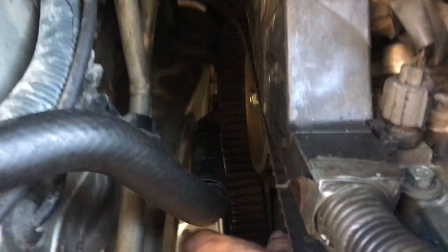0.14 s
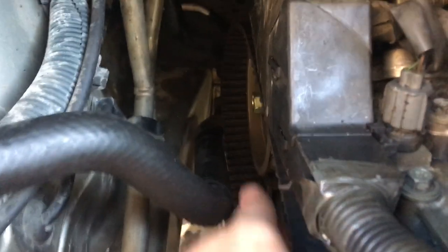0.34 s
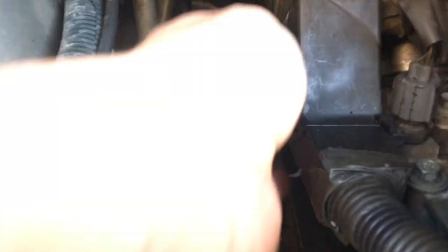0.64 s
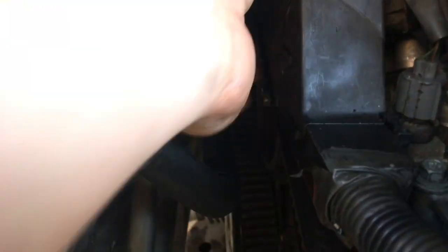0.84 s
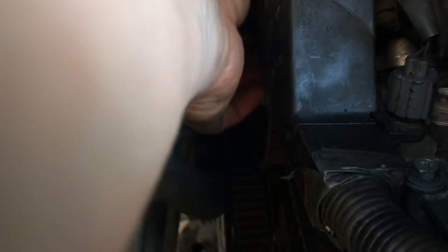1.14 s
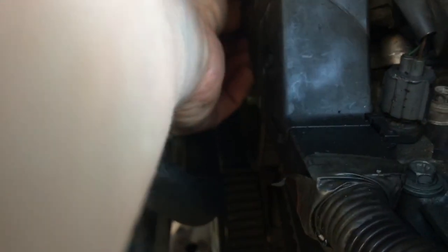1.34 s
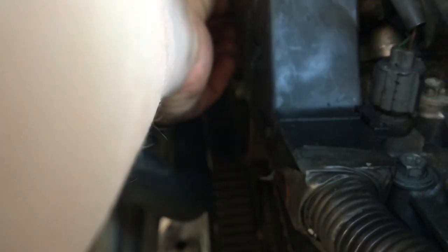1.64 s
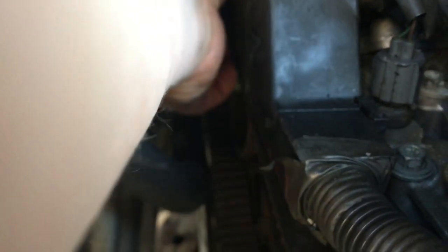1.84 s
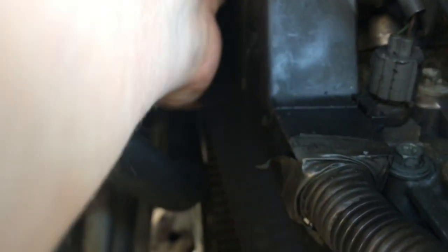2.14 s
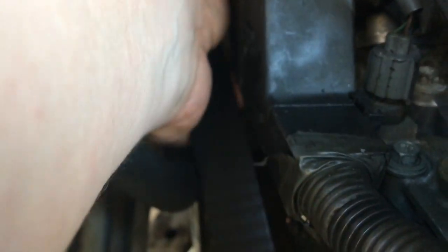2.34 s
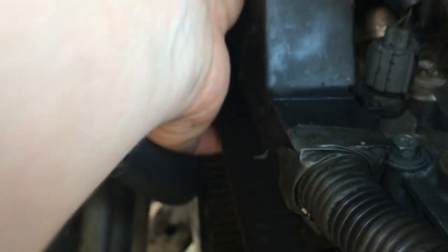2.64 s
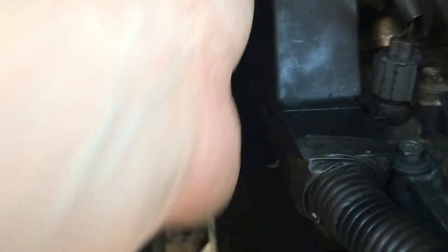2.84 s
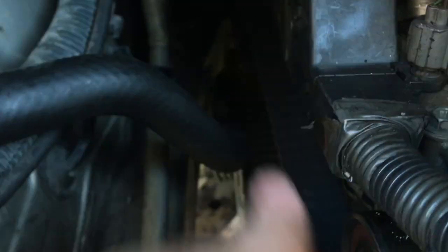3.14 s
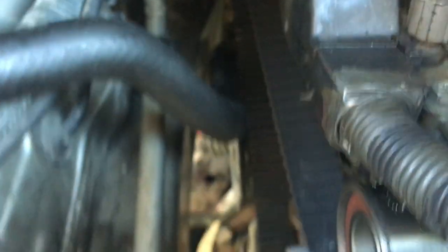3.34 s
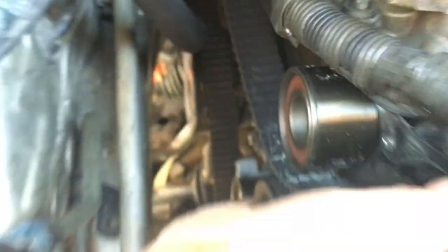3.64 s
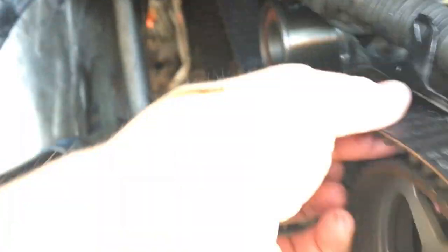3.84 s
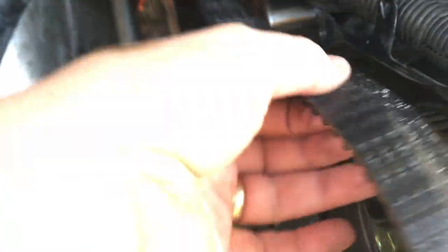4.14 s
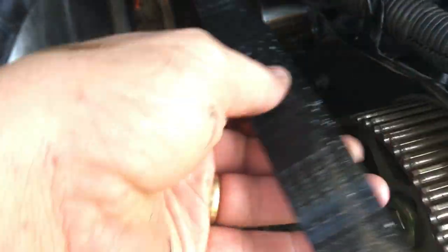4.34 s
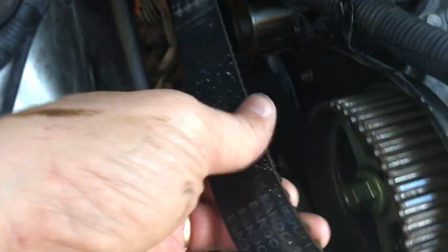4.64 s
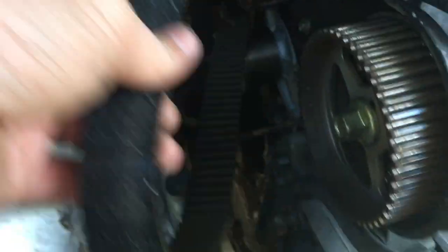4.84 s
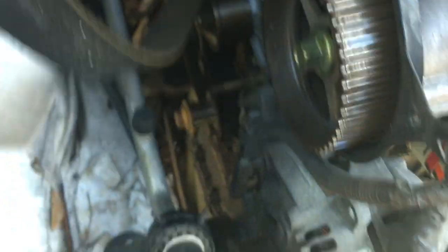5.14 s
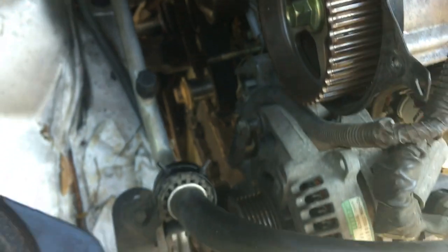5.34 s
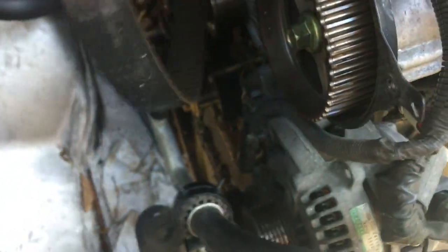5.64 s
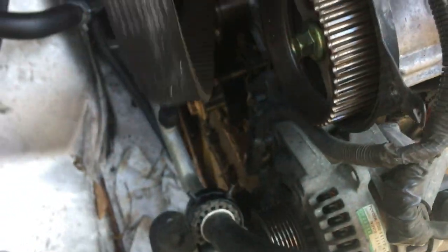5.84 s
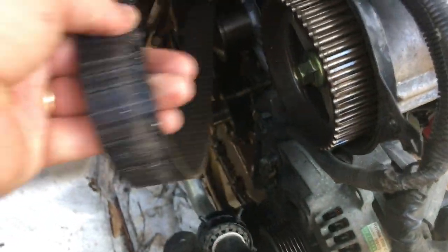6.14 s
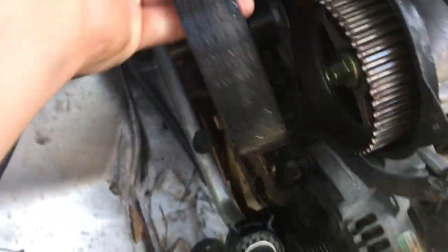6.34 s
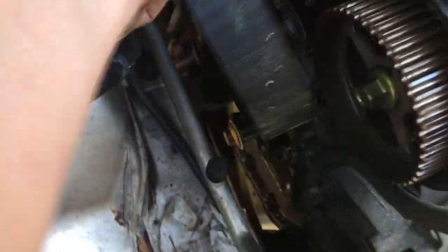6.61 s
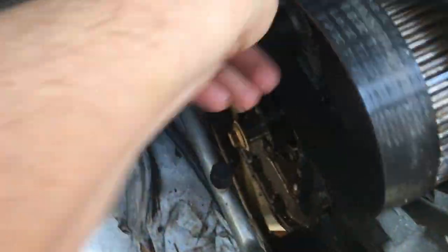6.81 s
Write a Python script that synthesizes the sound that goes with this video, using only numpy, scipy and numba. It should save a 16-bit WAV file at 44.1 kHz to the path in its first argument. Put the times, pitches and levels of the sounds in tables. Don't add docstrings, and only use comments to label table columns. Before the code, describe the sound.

A close, dry phone pickup inside an engine bay, with faint low machinery rumble and a wavering mains hum throughout. At 0.16 s a plastic clip lets go with a very loud, sharp snap and fast weakening rebounds; a soft belt slap follows at 0.46 s with small ticks. Until about 3.1 s, skin and rubber rub in irregular hissing, dragging strokes, with brief squeaks. Around 2.0 s steel wheels ring high and thin, and a strong tick lands at 2.4 s. After a short lull, rubbing resumes at 3.4 s, with ticks and metallic pings from 4.0 to 4.85 s. A heavy, dull slap hits at 4.92 s. Quieter drags follow, then light thin-metal brushes at 5.7-5.9 s. Knocks cluster at 6.0 s, with a soft slap at 6.13 s. Hard ticks, rubbing, slaps and bright ringing steel finish from 6.6 to 6.85 s.

```python
import sys
import numpy as np
from scipy import signal
from scipy.io import wavfile
from scipy.ndimage import uniform_filter1d
from numba import njit

SR = 44100
rng = np.random.default_rng(int(sys.argv[2]) if len(sys.argv) > 2 else 0)


def volts_from_db(level):
    exponent = np.asarray(level, float) / 20
    return 10 ** exponent


def master(y):
    cut = np.clip(np.atleast_2d(y).T, -1, 1)
    pcm = np.round(cut * 32767)
    wavfile.write(sys.argv[1], SR, pcm.astype(np.int16))


N = 307377

# start in seconds, length in seconds, skin hiss in dB,
# rubber drag over the hiss in dB.
SLIDES = [(0.03, 0.24, -64.5, -3), (.244, 0.31, -64, 0), (0.47, 0.3, -59.5, -5), (0.862, 0.63, -66.5, 5),
          (.928, 0.1, -60.5, -2), (1.086, 0.21, -61, 1.5), (1.519, 0.22, -72, 7.5),
          (1.761, 0.5, -66.5, 1.5), (2.258, 0.12, -71.5, 2.5), (1.877, 0.23, -61.5, -3),
          (2.447, 0.23, -68.5, 2), (2.637, 0.13, -58.5, -2.5), (2.763, 0.31, -63.5, -10),
          (3.44, 0.094, -69.5, 3.5), (3.62, 0.26, -70, -1.5), (3.836, 0.49, -66.5, 8),
          (4.316, 0.14, -72.5, 12.5), (4.436, 0.418, -66, 10), (4.767, 0.26, -65.5, 8),
          (5.006, 0.18, -75, 13.5), (5.05, 0.24, -77.5, 8), (5.19, 0.38, -85, 14.5),
          (5.607, 0.36, -74.5, 5), (5.951, 0.12, -67, 4), (6.109, 0.29, -82, 16), (6.238, 0.34, -68, 4),
          (6.633, 0.44, -64.5, 3.5)]
# start in seconds, length in seconds, skin hiss in dB,
# rubber drag over the hiss in dB.
JERKS = [(0, 0.015, -80.5, 25), (0.503, 0.061, -63, -13), (0.565, 0.059, -56, -0.5),
         (1.546, 0.079, -64.5, 1), (1.963, 0.081, -53, -14), (2.2, 0.04, -58, 1.5),
         (2.362, 0.033, -58.5, 2), (2.398, 0.038, -52.5, -3), (2.487, 0.088, -53, -5.5),
         (2.926, 0.091, -60, -12), (2.998, 0.055, -62.5, 2.5), (3.484, .045, -63, -5),
         (3.523, 0.024, -49.5, -3), (3.634, 0.044, -66.5, -1.5), (3.88, 0.36, -81, 22),
         (4.052, 0.076, -57, 4), (4.195, 0.11, -56, -20), (4.605, 0.16, -55, -7),
         (5.147, 0.036, -60.5, -18), (5.28, 0.053, -66, -13), (5.56, 0.043, -63.5, 4.5),
         (5.78, .07, -62, -13), (6.075, 0.035, -61, 3.5), (6.6, 0.04, -44.5, -16),
         (6.637, 0.029, -56.5, -5), (6.334, 0.119, -67.5, 3), (6.748, 0.044, -68, -1),
         (6.762, 0.11, -59, -16.5), (6.847, 0.085, -60, 5.5)]
STROKE_RISE_S, STROKE_FALL_S, REST_DB = 0.014, 0.031, -80
# centre in Hz, width in Hz, level in dB.
DRAG_BANDS = [(300, 59, 8.5), (680, 400, 5.5), (1180, 220, 1), (1597, 950, 1.5), (2200, 160, 2.5),
              (3000, 460, -7.5)]
# centre in Hz, width in Hz, level in dB.
HISS_BANDS = [(4335, 2500, -0.5), (6563, 1400, 0.5), (8810, 2075, -0.5), (12500, 6600, 0)]
# start
# in seconds, resonance in Hz.
HAND_CAVITY = [(0, 1481), (.463, 3910), (.63, 5200), (.928, 3083), (1.29, 6127), (1.5, 2397), (1.88, 3260),
               (2.384, 5930), (3.05, 1179), (4.031, 3613), (4.121, 2200), (4.86, 5800), (4.91, 3883),
               (5.094, 3790), (5.2, 3480), (5.552, 3326), (5.966, 4204), (6.236, 3893), (6.375, 4490),
               (6.425, 3950), (6.59, 5390), (6.74, 1800), (6.849, 1400)]
# start in seconds, length in seconds, first pitch in Hz,
# last pitch in Hz, level in dB.
SQUEAKS = [(0.278, 0.11, 1514, 1620, -61), (0.922, 0.061, 3700, 3520, -56),
           (2.205, 0.028, 2080, 1760, -54.5), (3.016, 0.041, 1800, 1540, -64), (3.58, 0.26, 744, 637, -61),
           (3.868, 0.07, 960, 1240, -55.5), (4.053, 0.043, 3000, 3000, -52), (4.95, 0.06, 5250, 5200, -61),
           (5.784, 0.037, 2190, 2120, -61), (6.37, 0.074, 2570, 2530, -64),
           (6.592, 0.08, 2190, 2300, -50.5)]

# start in seconds, peak in dB, contact pitch in Hz,
# bright crack over the peak in dB.
TICKS = [(0.585, -34.5, 7260, 6), (.607, -33.5, 3480, 7.5), (.933, -35.5, 3500, -14),
         (2.002, -40.5, 3450, 16), (2.016, -44, 3000, 4), (2.071, -44, 2100, -2), (2.125, -46, 2100, 6),
         (2.203, -41, 1990, -10), (2.306, -54, 5000, 4), (2.338, -49, 5000, 4), (2.355, -54, 5500, 2),
         (2.256, -42, 3500, 8), (2.417, -21, 6030, -28), (2.58, -37, 3000, -15), (2.662, -47, 5500, 14),
         (3.53, -34.5, 2063, 6.5), (4.028, -35, 3900, -12), (4.03, -32.5, 2620, -20),
         (4.06, -33.5, 3280, -10), (4.242, -51, 2290, 1), (4.342, -37.5, 3970, 3), (4.445, -45, 2900, -10),
         (4.526, -31.5, 3930, 0), (4.606, -37.5, 3530, 9), (4.636, -37, 3490, 9), (4.656, -38, 3490, 5),
         (4.68, -42, 4500, 4), (4.706, -43, 5200, 2), (4.73, -43, 5000, 2), (5.789, -47, 2110, -3),
         (5.984, -30, 3670, -42), (6.088, -42, 3970, 0), (6.606, -39, 3000, -5), (6.617, -35, 4300, 5),
         (6.628, -36, 3300, -2), (6.687, -21, 3700, -32.5), (6.7, -41, 3500, -8), (6.767, -42.5, 3600, -8),
         (6.779, -33, 3380, -14)]
# start in seconds, peak in dB, contact pitch in Hz, bright crack over the peak in dB.
SCUFFS = [
    (2.029, -35, 3450, -12.5),
    (3.885, -44, 1110, -14),
    (5.573, -45, 2020, -16.5),
    (5.84, -42.5, 3230, -3),
    (6.602, -36, 2220, -13),
]
# start in seconds, peak in dB, contact pitch in Hz, thud over the peak in dB.
KNOCKS = [(0.167, -19, 720, -5.5), (0.72, -58.5, 1240, 15.5), (2.15, -39, 2010, -5.5),
          (2.724, -48.5, 3250, 9.5), (2.949, -50, 500, 14.5), (3.553, -38, 716, -20), (4.2, -31.5, 965, -2),
          (4.854, -39, 1020, 0), (5.369, -46, 1200, 7), (5.966, -32, 4050, -6.5),
          (6.012, -26.5, 3580, -6.5), (6.0264, -25.5, 3900, -7), (6.33, -40.5, 3860, -3.5),
          (6.729, -37.5, 1800, 1.5), (6.743, -39, 1460, 6), (6.799, -41.5, 3500, 11.5),
          (6.82, -24, 820, -2.5)]
TICK_T60_S, SCUFF_T60_S, KNOCK_T60_S = 0.022, 0.068, 0.053
TICK_THUD_DB, KNOCK_CRACK_DB = -27, -68
TICK_RISE_S = 0.0011

# start in seconds, level in dB, lean to the small wheel in dB,
# rim over the strike in dB.
STRIKES = [(.355, -69, -4, -9), (.77, -75.5, 4, -9), (1.048, -72, -12, -12), (1.287, -69, 9, -8),
           (1.345, -73, -4, -2), (1.3818, -70, 6, 0), (1.492, -73, 4, -6), (1.56, -72, 2, 6),
           (1.602, -60, 16, -5), (1.699, -67, 6, 0), (1.797, -62.5, -6, 1), (1.8397, -65.5, 22, 9.5),
           (1.899, -68, 8, 8), (1.9494, -58.5, -8, -16), (1.9704, -44.5, -28, -3), (2.0023, -37, -17, -4),
           (2.0294, -53, -15, -22), (2.0744, -48, -25, -12), (2.2554, -60, -23, 1.5), (2.655, -68, -21, -8),
           (2.6794, -66, -20, -12), (2.724, -57.5, -26, -21), (3.0694, -74.5, -11, -12),
           (3.882, -67.5, 12, -9), (4.0278, -69, 16, 11), (4.0606, -75, 14, -2), (4.13, -64.5, 14, -6),
           (4.341, -69, 19, 4), (4.48, -72, -10, -9), (4.525, -55.5, 5, 0), (4.591, -57.5, 9, -5),
           (4.6055, -51.5, -3, -11), (4.6359, -55.5, -1, -17), (4.6567, -49, -2.5, -15), (4.69, -60, 4, -9),
           (4.73, -56.5, -2.5, -12), (4.825, -66, 2, -12), (4.8497, -62.5, 2.5, 3), (4.97, -63.5, 10, -9),
           (5.02, -76, 12, -7), (5.99, -67.5, 14, 2), (6.035, -57, -11, -6), (6.1, -69.5, 2, 4),
           (6.779, -59, -14, -9), (6.8, -48.5, 5, -4), (6.8208, -39.5, 7.5, -12)]
# start in seconds, level in dB, lean to the small wheel in dB.
PINGS = [(1.797, -68, -5), (1.8397, -61, 6), (1.899, -60, 0), (1.9704, -53, -5), (2.0023, -59, -6),
         (2.0294, -58, 0), (4.0278, -57, -6), (4.0602, -46.5, -10), (4.526, -72, 0), (4.6339, -65, 0),
         (4.6563, -66, 3), (4.706, -60, 8), (4.7304, -64, 4), (5.985, -54, -14), (6.0116, -66, -12),
         (6.0402, -66, -8), (6.8, -53, 14), (6.82, -46, 14)]
GRIPS_S = [.47, 1.12, 1.335, 1.445, 1.686, 1.77, 1.94, 2.07, 2.185, 2.33, 2.93, 4.12, 4.42, 4.588, 4.72,
           4.815, 4.9, 5.06, 6.095, 6.19, 6.799]
# start in seconds, end in seconds.
ON_WHEELS_S = (1.25, 5.3)
# large wheel, small wheel, rim, large teeth, small teeth, all in dB.
CREEP_DB = (-56, -53, -56, -54, -54)
# pitch in Hz, level in dB, T60 in seconds.
LARGE_WHEEL = [(3490, 4.5, 0.78), (816, -17, 0.14)]
# pitch in Hz, level in dB, T60 in seconds.
SMALL_WHEEL = [(3964, 5, .62), (3972, -1, .35), (1416, -5, .75)]
# pitch in Hz, level in dB, T60 in seconds.
RIM = [(7200, -7, .3), (7600, -4, .3)]
# pitch in Hz, level in dB, T60 in seconds.
LARGE_TEETH = [(11070, -10, .2), (9800, -13, 0.1)]
# pitch in Hz, level in dB, T60 in seconds.
SMALL_TEETH = [(11330, -5.5, .5), (9550, -12, .3)]

SNAPS = [
    (0.141, -43),
    (0.154, -45),
    (0.1636, -1.5),
    (0.166, -4.5),
    (0.169, -6.5),
    (0.179, -18.5),
    (0.189, -24),
    (.194, -23.5),
]
CLIP_MODES = [(1608, -19, 0.19), (1800, -18.5, 0.22), (2226, 5.5, 0.021), (2260, -23.5, 0.27),
              (4010, -21, 0.3), (5200, -21.5, 0.2), (5430, -14, 0.12), (5610, -10, 0.1), (5790, -13, 0.1),
              (7240, -21, 0.19), (13000, -24.5, 0.16)]
CLIP_CRACK = [(1600, 1500, -22.5, 0.19), (2200, 840, -2.5, 0.036), (4100, 800, -9, 0.038),
              (5247, 720, 2.5, 0.028), (8600, 1000, -14, 0.024), (13070, 4400, -17, 0.024)]
# start in seconds, ring in dB, crack in dB, contact in seconds.
SLAPS = [
    (0.461, -29, -68.5, 0.0049),
    (6.127, -34, -59, 0.0026),
    (4.913, -36.5, -24, 0.00012),
    (4.918, -25, -47, 0.00069),
    (4.931, -15.5, -55, 0.0028),
    (6.691, -51, -39, 0.00051),
    (6.71, -28.5, -76, 0.0028),
    (6.817, -36.5, -29, 0.0003),
]
# pitch in Hz, level in dB, T60 in seconds.
BODY_MODES = [(181.3, 0, 0.1603), (365, -4.5, 0.066), (687, 4.5, 0.11), (940, -34, 0.16), (1240, 9, 0.044),
              (1610, -11, 0.05), (1800, -25, 0.018), (1974, 8, 0.039)]
# centre in Hz, width in Hz, level in dB, T60 in seconds.
BODY_CRACK = [(214, 186, -3, 0.25), (490, 1600, -11, 0.074), (815, 630, -5.5, 0.14),
              (1620, 1700, 16, 0.0096), (3580, 710, -2.5, 0.021), (6200, 7100, -11, 0.036),
              (12100, 5000, -32, .03)]
# start in seconds, level in dB.
BRUSHES = [
    (5.698, -61.5),
    (5.74, -62),
    (5.773, -59),
    (5.841, -43.5),
    (5.878, -59),
    (5.915, -66),
]
# pitch in Hz, level in dB, T60 in seconds.
BRACKET_MODES = [(3090, -0.5, 0.052), (5800, -17.5, 0.079)]

BAY_T60_S, BAY_DB = 0.037, -11.5
# frequency in Hz, density in dB per Hz.
GARAGE_SPECTRUM = [(30, -10.5), (45, 4), (90, 1.5), (125, -3), (150, -5.5), (205, -11.5), (245, -21.5),
                   (360, -22), (470, -34), (660, -28.5), (1300, -36.5), (2800, -45.5), (5000, -48.5),
                   (11700, -54.5)]
GARAGE_DB, HUM_DB, HUM_HZ = -42.5, -48.5, 119
MIC_LOW_HZ, MIC_TOP_HZ = 38, 15850


@njit
def svf(x, hz, width):
    y, b, l = np.empty(len(x)), 0., 0.
    g, k = np.tan(np.pi * hz / SR), width / hz
    for i in range(len(x)):
        v = (b + g * (x[i] - l)) / (1 + g * (g + k))
        b, l, y[i] = 2 * v - b, l + 2 * g * v, k * v
    return y


@njit
def sweep(x, hz, sharp):
    y, b, l = np.empty(len(x)), 0., 0.
    for i in range(len(x)):
        g = np.tan(np.pi * hz[i] / SR)
        v = (b + g * (x[i] - l)) / (1 + g * (g + 1 / sharp))
        b, l, y[i] = 2 * v - b, l + 2 * g * v, v / sharp
    return y


def unit(x):
    return x / np.sqrt(np.mean(x ** 2))


def walk(rate):
    hold = int(SR / rate)
    steps = np.repeat(rng.standard_normal(N // hold + 1), hold)
    return unit(uniform_filter1d(uniform_filter1d(steps, hold), hold)[:N])


def ring(push, modes):
    out = np.zeros(len(push))
    for hz, db, t60 in modes:
        pole = np.exp(2j * np.pi * hz / SR - np.log(1000) / (t60 * SR))
        out += volts_from_db(db) * signal.lfilter([1], [1, -pole], push).imag
    return out


def resonant_noise(noise, hz1, width1, hz2, width2):
    return unit(svf(svf(noise, float(hz1), float(width1)), float(hz2), float(width2)))


def crack(bands, rise_s):
    t = np.arange(SR // 3) / SR
    out = np.zeros(len(t))
    for hz, width, db, t60 in bands:
        envelope = volts_from_db(db - 60 * t / t60) * np.minimum(t / (rise_s + 3.0 / hz), 1)
        out += envelope * resonant_noise(rng.standard_normal(len(t)), hz, width, hz, 1.5 * width)
    return out


def add(track, s, sound):
    i = int(s * SR)
    track[i:i + len(sound)] += sound[:len(track) - i]


def strokes():
    t = np.arange(N) / SR
    hiss = np.full(N, volts_from_db(2 * REST_DB))
    drag = hiss.copy()
    for s, length, db, drag_db in SLIDES + JERKS:
        edges = np.minimum((t - s) / STROKE_RISE_S, (s + length - t) / STROKE_FALL_S)
        held = np.clip(edges + .5, 0, 1) ** 3
        hiss += held * volts_from_db(2 * db)
        drag += held * volts_from_db(2 * (db + drag_db))
    return hiss, drag


def rubbing():
    t = np.arange(N) / SR
    hiss, drag = strokes()
    move_s, move_hz = np.transpose(HAND_CAVITY)
    held_hz = move_hz[np.maximum(np.searchsorted(move_s, t) - 1, 0)]
    cavity_hz = uniform_filter1d(held_hz, SR // 90)
    out = np.zeros(N)
    for power, bands, grain_db, cavity_db in ((hiss, HISS_BANDS, 2.5, 2), (drag, DRAG_BANDS, 3.0, 7)):
        grains = rng.standard_normal(N) * volts_from_db(grain_db * np.minimum(rng.exponential(size=N), 5))
        grains *= volts_from_db(2.1 * walk(60))
        catches = np.repeat(rng.random(N // 16 + 1) < .012, 16)[:N]
        grains *= 1 + 2.5 * catches
        body = np.zeros(N)
        for hz, width, db in bands:
            level = volts_from_db(db + 2.5 * walk(15))
            body += level * sweep(grains, hz * (1 + .04 * walk(7)), hz / width)
        cavity = sweep(grains, cavity_hz * (1 + .03 * walk(12)), 15.)
        out += unit(body + volts_from_db(cavity_db) * cavity) * np.sqrt(power)
    return out


def squeaks():
    out = np.zeros(N)
    for s, length, hz0, hz1, db in SQUEAKS:
        hz = np.linspace(hz0, hz1, int(length * SR))
        noise = rng.standard_normal(N // 20)[:len(hz)]
        tone = unit(sweep(sweep(noise, hz, 16.), hz, 16.))
        rise = np.minimum(np.arange(len(hz)) / 200, 1)
        fall = np.linspace(1, 0, len(hz)) ** .5
        add(out, s, volts_from_db(db) * tone * rise * fall)
    return out


def ticks():
    out, t = np.zeros(N), np.arange(SR // 5) / SR
    contacts = [(s, db, hz, TICK_THUD_DB, crack_db, TICK_T60_S) for s, db, hz, crack_db in TICKS]
    contacts += [(s, db, hz, TICK_THUD_DB, crack_db, SCUFF_T60_S) for s, db, hz, crack_db in SCUFFS]
    contacts += [(s, db, hz, thud_db, KNOCK_CRACK_DB, KNOCK_T60_S) for s, db, hz, thud_db in KNOCKS]
    for s, db, hz, thud_db, crack_db, t60 in sorted(contacts):
        noise = rng.standard_normal((3, len(t)))
        fade = volts_from_db(-60 * t / max(t60, .004)) * np.minimum(t / TICK_RISE_S, 1)
        broad = resonant_noise(noise[0], hz, hz, hz, 1.4 * hz) * fade ** 1.31
        pitched = resonant_noise(noise[0], hz, 0.059 * hz, hz, hz) * fade ** 1.03
        bright = resonant_noise(noise[1], 8600, 9000, 8000, 12000) * fade
        thud = resonant_noise(noise[2], 200, 370, 390, 1100) * fade ** 0.52 * np.minimum(t / 0.0024, 1)
        burst = broad + pitched + volts_from_db(crack_db - 4.0) * bright + volts_from_db(thud_db + 2.5) * thud
        add(out, s, volts_from_db(db - 10.0) * burst)
    return out


def wheels():
    out = np.zeros(N)
    edges = np.r_[0, (np.array(GRIPS_S) * SR).astype(int), N]
    on = slice(*(int(s * SR) for s in ON_WHEELS_S))
    creep = np.zeros(N)
    creep[on] = np.sqrt(strokes()[1][on])
    s, db, lean_db, rim_db = np.transpose(STRIKES)
    ping_s, ping_db, ping_lean_db = np.transpose(PINGS)
    parts = [(LARGE_WHEEL, s, db - np.maximum(lean_db, 0)),
             (SMALL_WHEEL, s, db + np.minimum(lean_db, 0)),
             (RIM, s, db + rim_db),
             (LARGE_TEETH, ping_s, ping_db - np.maximum(ping_lean_db, 0)),
             (SMALL_TEETH, ping_s, ping_db + np.minimum(ping_lean_db, 0))]
    for k, (modes, hit_s, hit_db) in enumerate(parts):
        push = volts_from_db(CREEP_DB[k]) * creep * rng.standard_normal(N)
        push[(hit_s * SR).astype(int)] += volts_from_db(hit_db)
        for mode in modes:
            flicker = volts_from_db((2.8 + .4 * k) * walk(40))
            for a, b in zip(edges[:-1], edges[1:]):
                damping = np.minimum(np.arange(b - a)[::-1] / 1000 + (b == N), 1)
                out[a:b] += ring(push[a:b], [mode]) * flicker[a:b] * damping
    return out


def snap():
    push, out = np.zeros(N), np.zeros(N)
    for s, db in SNAPS:
        add(push, s, volts_from_db(db - 25.5) * rng.standard_normal(24) * np.hanning(24))
        add(out, s, volts_from_db(db - 6.5) * crack(CLIP_CRACK, rise_s=0.00064))
    return ring(push, [(hz, db, .7 * t60) for hz, db, t60 in CLIP_MODES]) + out


def slaps():
    push, out = np.zeros(N), np.zeros(N)
    for s, ring_db, crack_db, contact_s in SLAPS:
        bump = np.hanning(int(contact_s * SR) + 3)
        add(push, s, -volts_from_db(ring_db) * bump / bump.sum())
        add(out, s, volts_from_db(crack_db) * crack(BODY_CRACK, rise_s=0.0025))
    return ring(push, [(hz, db, 0.98 * t60) for hz, db, t60 in BODY_MODES]) + out


def bracket():
    push = np.zeros(N)
    s, db = np.transpose(BRUSHES)
    push[(s * SR).astype(int)] = volts_from_db(db)
    return ring(push, BRACKET_MODES)


def engine_bay(near):
    t = np.arange(SR // 2) / SR
    tail = svf(rng.standard_normal(len(t)), 820.0, 4300.0) * volts_from_db(-60 * t / BAY_T60_S)
    return volts_from_db(BAY_DB) * signal.fftconvolve(near, tail / np.sqrt(np.sum(tail ** 2)))[:N]


def garage():
    hz_pts, db_pts = np.transpose(GARAGE_SPECTRUM)
    rumble, swell = np.zeros(N), walk(0.37)
    for hz in 32 * 2 ** np.arange(0, 9, 1 / 3):
        third = signal.butter(3, [hz / 1.13, hz * 1.13], "bandpass", fs=SR, output="sos")
        band = signal.sosfilt(third, rng.standard_normal(N))
        band_db = np.interp(np.log(hz), np.log(hz_pts), db_pts)
        rumble += volts_from_db(band_db + 0.36 * swell + 2.2 * walk(4)) * band
    hum = np.sin(2 * np.pi * np.cumsum(HUM_HZ * (1 + 0.009 * walk(3.8))) / SR)
    return volts_from_db(GARAGE_DB) * unit(rumble) + volts_from_db(HUM_DB + 2.0 * walk(2.9)) * hum


def scene():
    near = ticks() + snap() + slaps() + squeaks() + wheels() + bracket()
    return (near + engine_bay(near) + rubbing() + garage())[None]


def band_limit(x):
    return signal.sosfilt(signal.butter(12, 16660, fs=SR, output="sos"), x)


def record(dry):
    low_cut = signal.butter(5, MIC_LOW_HZ, "highpass", fs=SR, output="sos")
    top_cut = signal.ellip(8, .3, 60, MIC_TOP_HZ, fs=SR, output="sos")
    mic = signal.sosfilt(top_cut, signal.sosfilt(low_cut, dry))
    return band_limit(np.clip(mic, -1, 1))


dry = scene()
out = record(dry)
master(out)
```